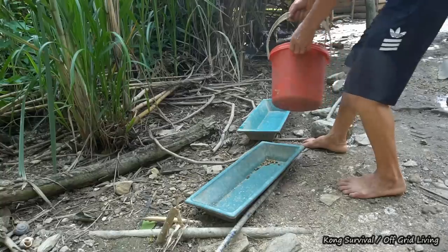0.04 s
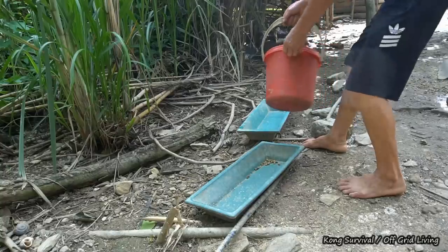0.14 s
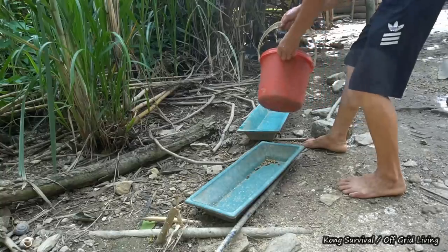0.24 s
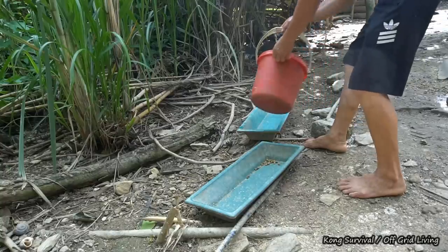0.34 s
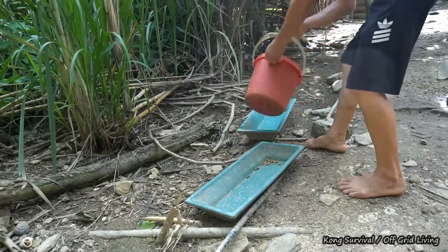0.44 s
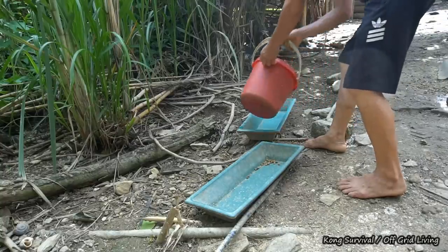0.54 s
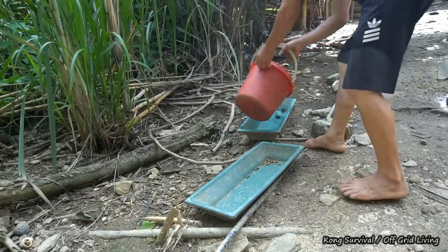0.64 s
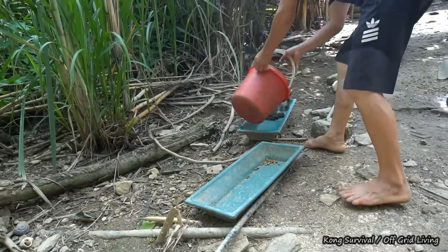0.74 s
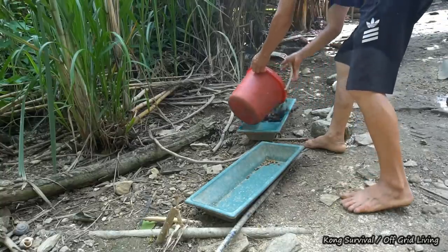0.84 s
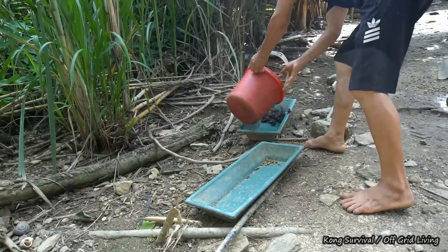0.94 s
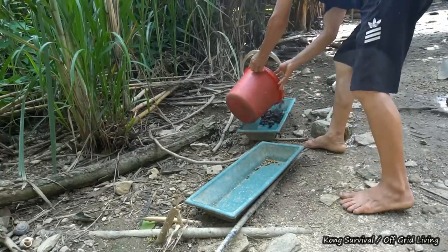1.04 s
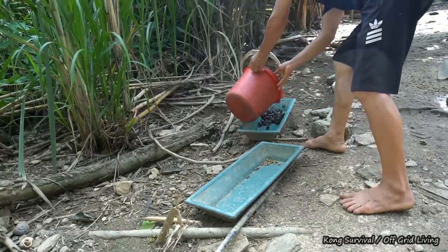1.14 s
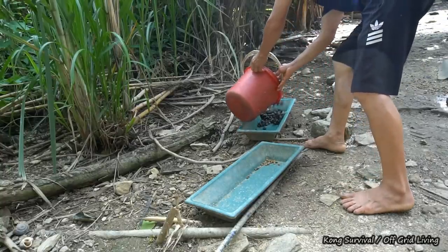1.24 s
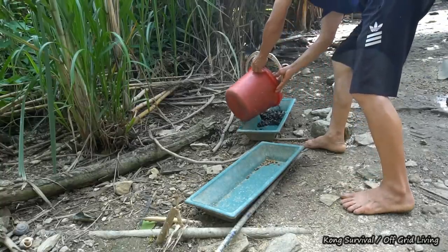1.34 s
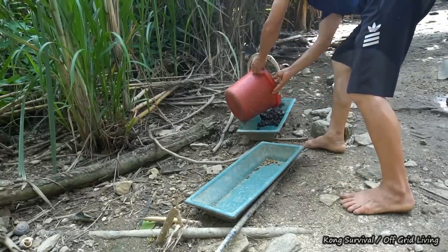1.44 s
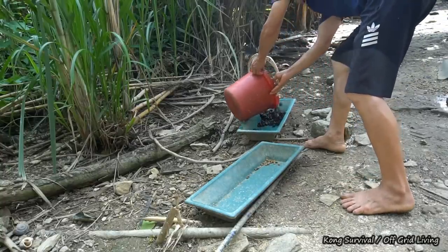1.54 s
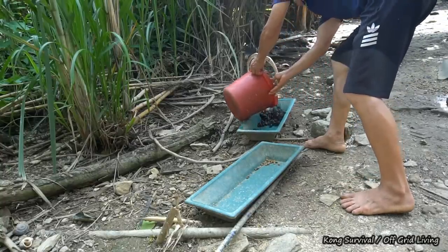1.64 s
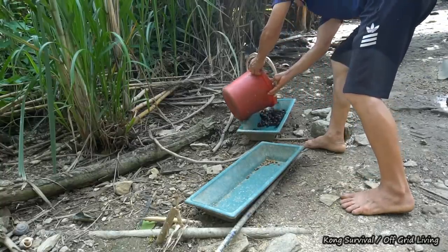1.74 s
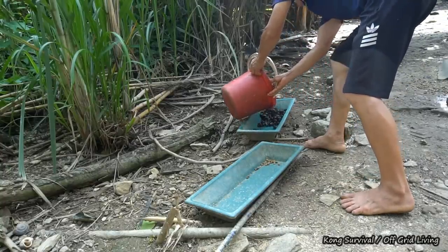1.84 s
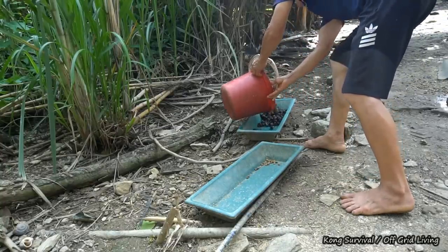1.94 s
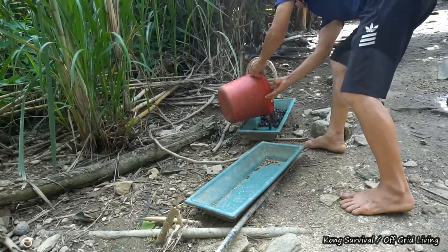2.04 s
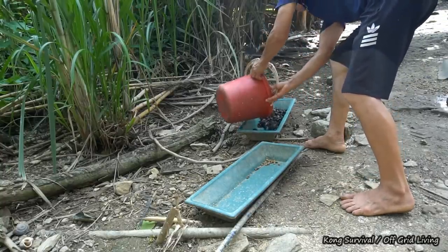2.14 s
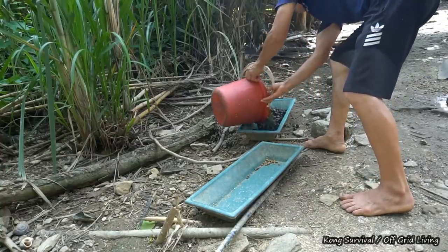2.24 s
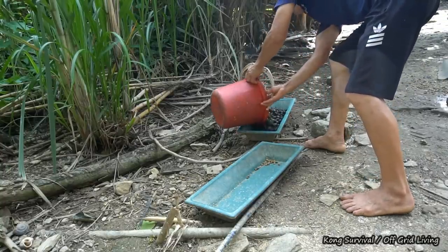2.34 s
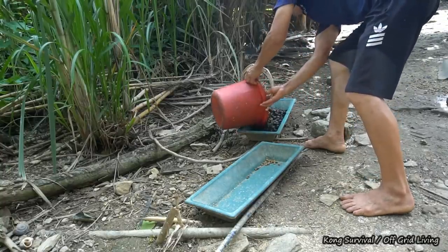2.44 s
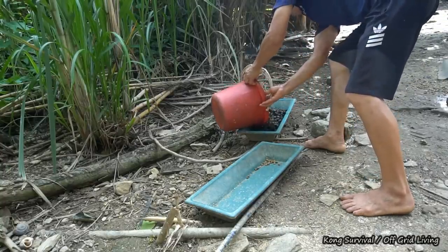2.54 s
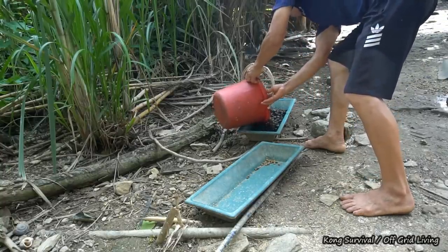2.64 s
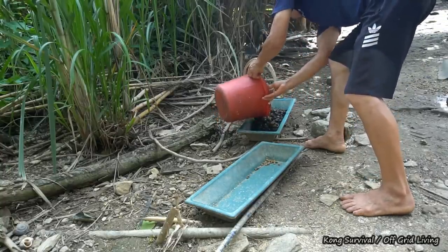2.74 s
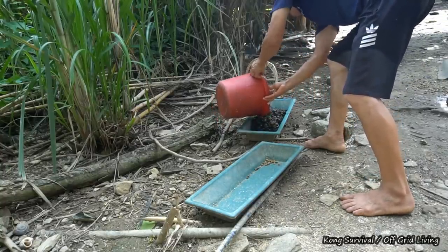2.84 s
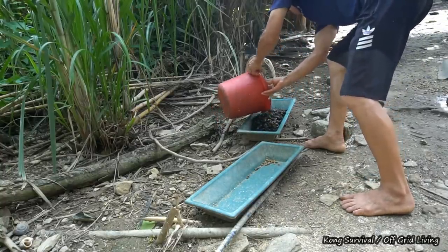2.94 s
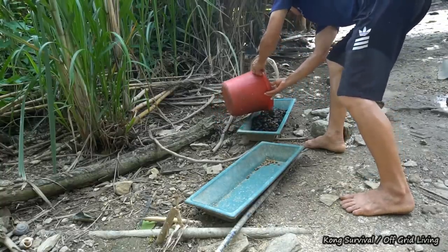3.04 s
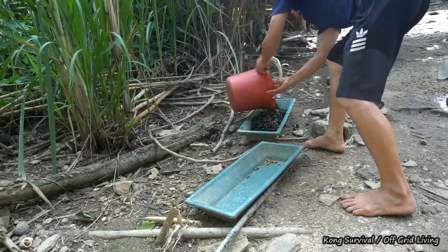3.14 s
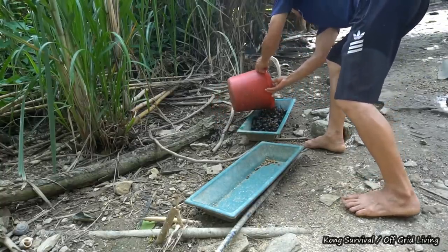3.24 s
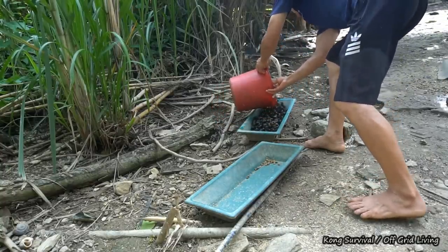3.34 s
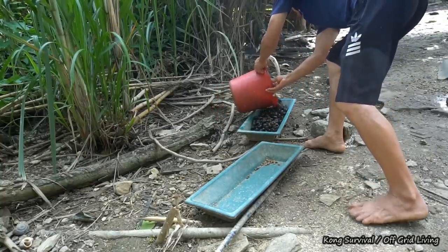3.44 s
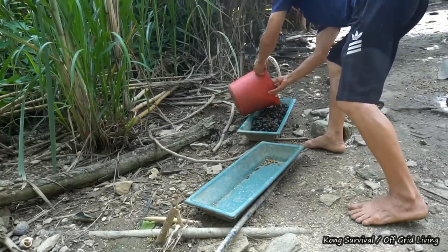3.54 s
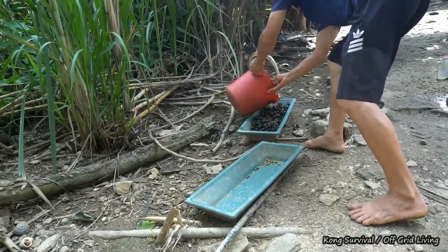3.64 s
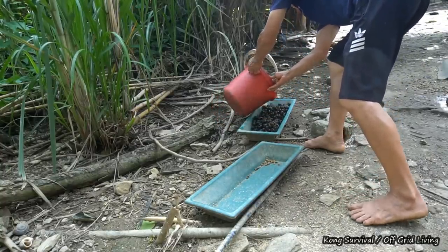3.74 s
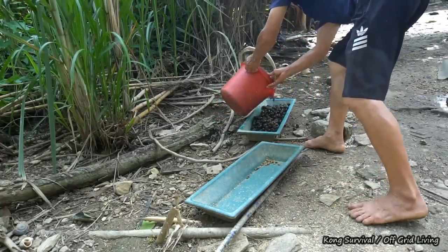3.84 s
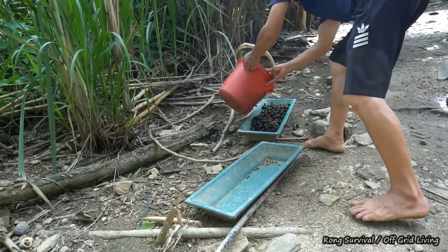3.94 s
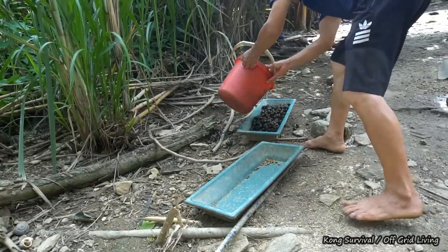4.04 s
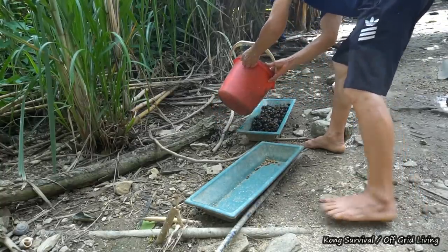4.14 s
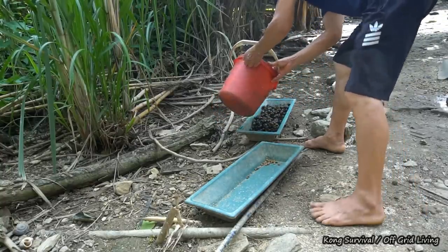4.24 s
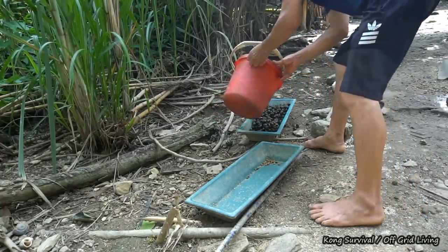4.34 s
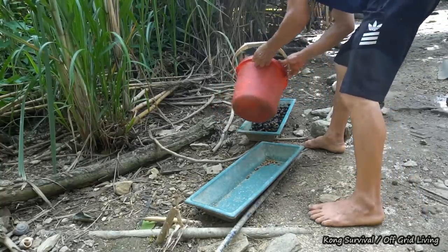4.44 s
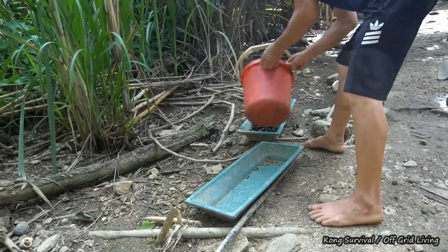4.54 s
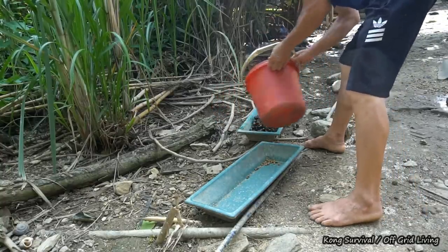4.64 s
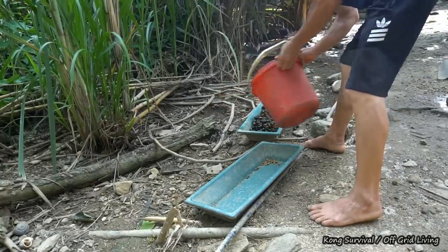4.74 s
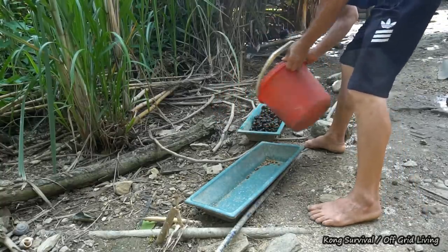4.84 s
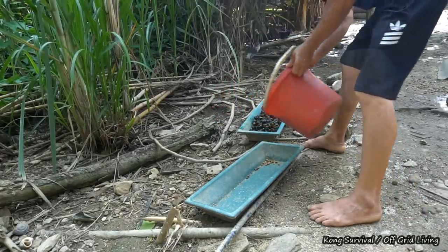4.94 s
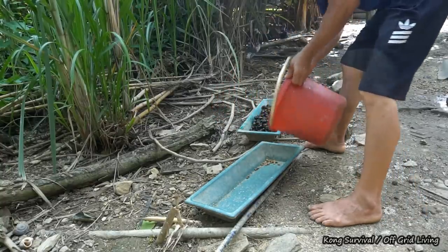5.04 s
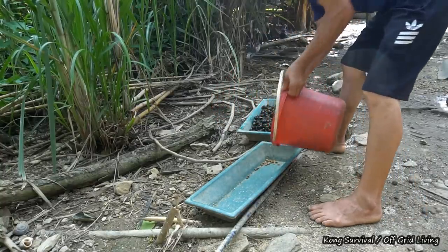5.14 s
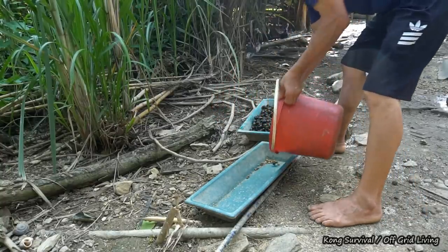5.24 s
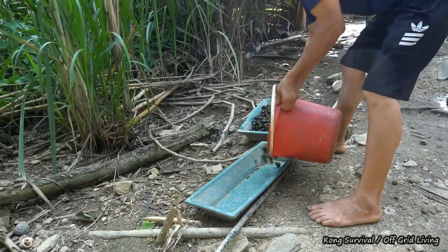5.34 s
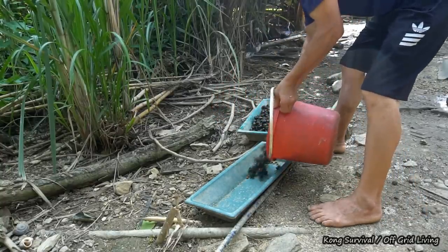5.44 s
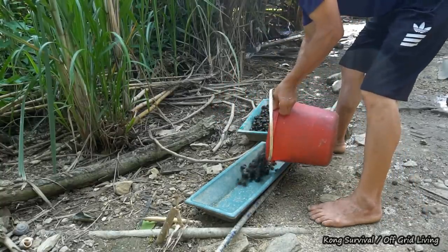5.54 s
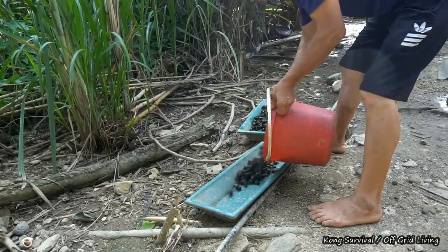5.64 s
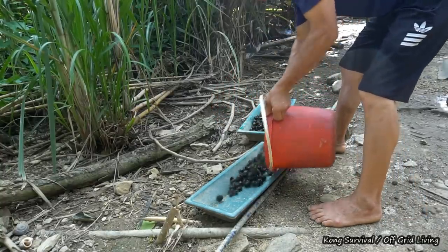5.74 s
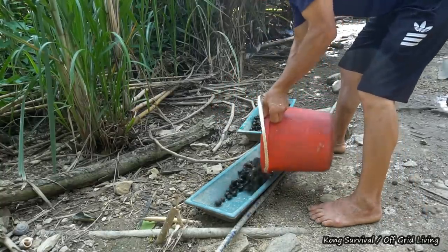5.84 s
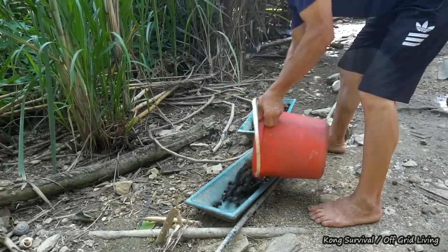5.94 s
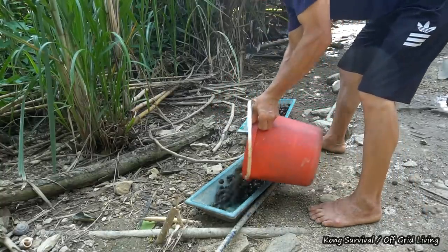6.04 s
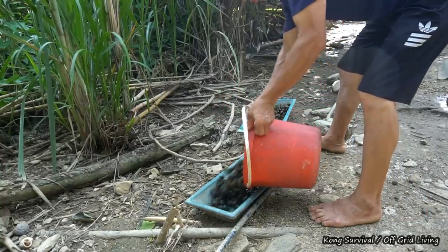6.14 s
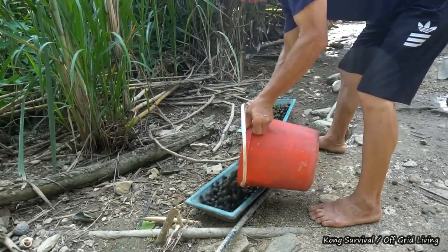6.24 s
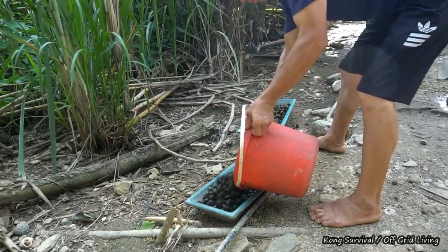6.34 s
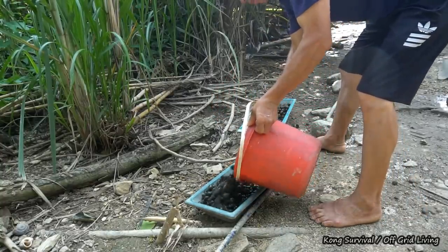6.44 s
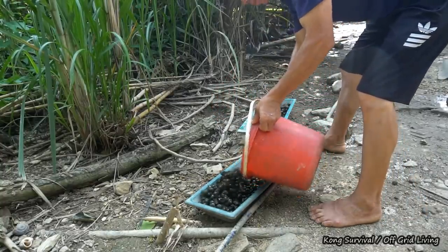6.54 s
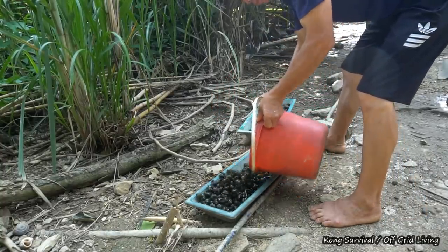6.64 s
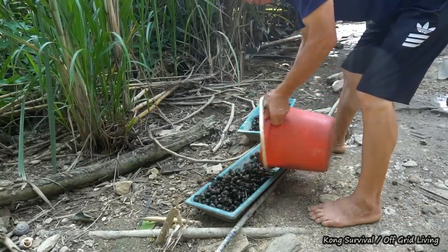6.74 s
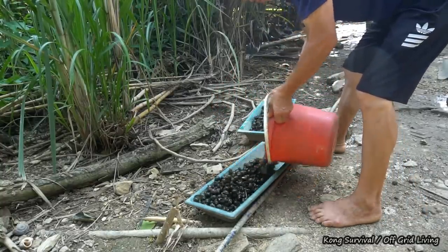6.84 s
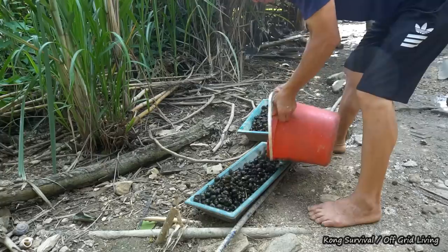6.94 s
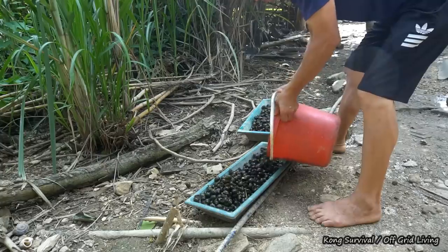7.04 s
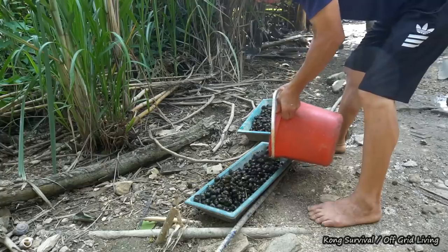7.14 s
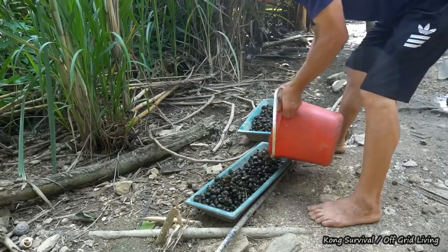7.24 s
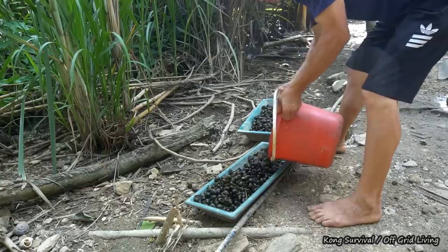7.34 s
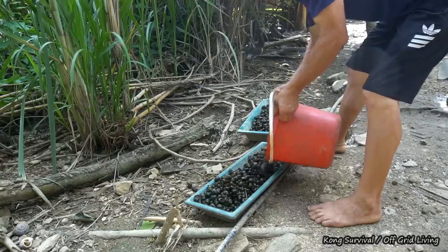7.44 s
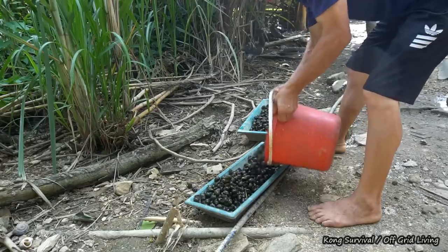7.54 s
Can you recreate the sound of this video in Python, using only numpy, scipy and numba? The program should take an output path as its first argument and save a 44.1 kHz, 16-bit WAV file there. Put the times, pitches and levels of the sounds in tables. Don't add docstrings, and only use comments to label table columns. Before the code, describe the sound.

Hard-shelled snails pour from a plastic bucket into two plastic trays, clattering in jerky surges outdoors, with insects and a faint distant rooster behind.

```python
import sys
import numpy as np
from scipy import signal
from scipy.io import wavfile
from scipy.ndimage import uniform_filter1d
from numba import njit

SR = 44100
rng = np.random.default_rng(int(sys.argv[2]) if len(sys.argv) > 2 else 0)


def wrap_up_sound(samples):
    columns = np.atleast_2d(samples).T
    tamed = np.clip(columns, -1, 1)
    steps = np.round(tamed * 32767).astype(np.int16)
    wavfile.write(sys.argv[1], SR, steps)


def volts_from_decibels(level):
    exponent = np.asarray(level, float) / 20
    return 10 ** exponent


N = 334719

# start in seconds, length in seconds, flow in dB,
# brightness in dB (low on bare plastic, high on a heap of shells).
FAR_SURGES = [(0.433, 0.25, -34.5, -4.5), (0.563, 0.06, -30, -3), (0.676, 0.095, -26.5, -3),
              (0.794, 0.26, -22, 1.5), (1.024, 0.23, -24.5, 2), (1.294, 0.15, -26, 1.5),
              (1.489, 0.1, -27.5, 3), (1.585, 0.2, -26.5, 1.8), (1.709, 0.14, -28.5, 2.5),
              (1.877, 0.085, -27.5, -3), (1.927, 0.12, -27, 5), (2.071, 0.053, -24, 1),
              (2.165, 0.16, -24, -0.5), (2.332, 0.17, -20.5, 1.7), (2.518, 0.17, -24, 1.5),
              (2.706, 0.49, -29.5, 0), (2.932, 0.22, -27, 1), (3.117, 0.13, -34, -3),
              (3.274, 0.1, -24.5, 2), (3.347, 0.22, -26, 0.0), (3.511, 0.19, -25.5, 0),
              (3.659, 0.18, -29.5, -1), (3.817, 0.098, -36, -4), (3.999, 0.091, -32, 2.5),
              (4.086, 0.015, -48, 16)]
NEAR_SURGES = [(5.138, 0.015, -43.5, 3), (5.233, 0.05, -33, -5.5), (5.324, 0.076, -28, -4),
               (5.427, 0.075, -24.5, -1.5), (5.523, 0.2, -20.5, 1), (5.718, 0.11, -23.5, -1),
               (5.841, 0.12, -22.5, -1.5), (5.913, 0.26, -21.5, 2.5), (6.111, 0.1, -22.5, 1),
               (6.222, 0.14, -20.5, 2), (6.394, 0.076, -24.5, 0), (6.477, 0.13, -22.5, 1.3),
               (6.642, 0.13, -24, 0.5), (6.814, 0.052, -25, -2.5), (6.877, 0.1, -21, 1),
               (7.0, 0.14, -24, 1), (7.075, 0.098, -23.5, -1), (7.21, 0.1, -25.5, 0.5),
               (7.327, 0.076, -24.5, 2), (7.453, 0.063, -25.5, -2), (7.514, 0.081, -27.5, 2)]
RISE_DB_PER_S, SAG_DB_PER_S, STOP_DB_PER_S = 439, 14.5, 350
USUAL_FLOW_DB = -25
TRAY_DB, TRAY_GROWTH, TRAY_MUFFLED = -0.5, 1.71, 0.62
CHIP_DB = -7
NEAR_TRAY_FROM_S = 5.1

# time in seconds, peak in dB, shell pitch in Hz, tray share in dB.
FAR_HITS = [(0.417, -5, 3220, -5), (0.564, 0, 1750, -9), (0.592, -4.5, 1860, -8.5), (0.605, -2, 1890, -7),
            (0.679, 3, 2900, -6), (0.709, -5, 3770, -2), (0.719, -3, 4900, -25), (0.751, -2.5, 3560, -20),
            (0.773, -4, 1850, -4), (0.901, 2, 1200, -15), (1.003, -2.5, 1490, -0.5), (1.303, -1, 7900, -24),
            (1.362, -13, 1930, -20), (1.435, -3, 1700, -12), (1.57, -3, 3130, -31), (1.584, 1, 2030, -5.5),
            (1.872, -2.5, 1200, -1.5), (2.051, -1.5, 2050, -27), (2.077, -2.5, 2100, -4),
            (2.12, -1, 4250, -29.5), (2.156, 0, 4640, -6.5), (2.299, -5.5, 1270, 3),
            (2.726, -2, 6900, -37.5), (2.758, -0.5, 4450, -23), (2.911, -18, 2470, -5),
            (3.054, -1, 2280, -14), (3.227, 1, 3050, -27), (3.665, -3, 2260, -17), (3.846, -5.5, 3000, -5),
            (3.999, 1, 2580, -7)]
NEAR_HITS = [(5.232, 1, 2530, -8), (5.274, -9, 3600, -21), (5.301, -8, 664, -10), (5.309, 0, 2450, -11),
             (5.348, -9, 3530, -16), (5.308, -5, 700, -27), (5.395, -4, 5500, -4.5),
             (5.444, -0.5, 2970, -15), (5.471, -7, 1360, 5.5), (5.507, -2, 1200, -7),
             (5.827, -4, 2270, -13), (5.911, -3, 1320, -25), (6.008, 0.5, 6250, -36),
             (6.207, -3.5, 1390, -7), (6.356, -0.5, 4300, -35), (6.398, -3.5, 4280, -29),
             (6.468, -8, 1350, -9), (6.658, -3, 1820, -30), (6.726, -1.5, 2420, -12), (6.822, -3, 1370, -9),
             (6.866, 3, 2350, -10), (6.936, 3.5, 4800, -24), (6.989, -3.5, 1200, -10),
             (7.04, -7, 1270, -1.5), (7.086, -0.5, 1280, -9), (7.16, -1, 3740, -6), (7.208, -6, 1700, -26),
             (7.243, -1.5, 4740, -37), (7.32, -2.5, 1290, -9), (7.365, -5, 4850, -30),
             (7.457, -7, 3550, -7), (7.507, -7, 2400, 3)]
# time in seconds, peak in dB, shell pitch in Hz, tray share in dB,
# tick share in dB.
STRAY_HITS = [(0.327, -25, 1400, 2, -25), (0.373, -25.5, 1400, -4, -19), (4.29, -29.5, 4800, -11, -10),
              (4.361, -23, 4040, -25, -25), (4.393, -15, 2520, -5.5, -23), (4.498, -28.5, 1410, -17, -24),
              (4.525, -36, 4900, 8, -27), (4.569, -15.5, 3300, -15, -26), (4.581, -20, 1900, 0.5, -26),
              (4.588, -18.5, 576, -22, -28), (4.593, -14, 2700, -4, -23), (4.599, -19, 1700, -6, -24),
              (4.687, -26, 1200, 0, -33), (4.379, -28, 2310, -15, -21), (4.774, -29.5, 380, -13, -13),
              (4.852, -11, 2860, -12, -36), (4.873, -25, 2430, -5, -18), (5.118, -34, 1310, 4, -20),
              (5.136, -11.5, 5100, -25, -16)]
TICK_DB, TICK_GROWTH = -22, 3

# time in
# seconds, peak in dB, shell pitch in Hz.
FAR_CLICKS = [(0.446, -26, 1280), (0.474, -26, 1600), (0.542, -25, 1000), (0.6713, -15, 3350),
              (0.6902, -9, 1750), (0.788, -15, 4850), (0.7987, -8, 1180), (0.8087, -20, 1800),
              (0.816, -12, 4540), (0.846, -11, 2300), (0.8683, -15, 10810), (0.8784, -11, 1970),
              (0.8863, -9, 4050), (0.9114, -9.5, 1540), (0.9473, -14.5, 5500), (0.967, -6, 2200),
              (0.986, -14, 5510), (1.0349, -18, 4860), (1.043, -10, 1200), (1.0837, -9.5, 6030),
              (1.1048, -11.5, 1830), (1.1199, -11.5, 3020), (1.145, -13, 7500), (1.156, -15, 1750),
              (1.1766, -10, 5300), (1.1855, -11, 2180), (1.212, -13.5, 1680), (1.227, -12, 10700),
              (1.2374, -13, 12300), (1.3681, -10, 7000), (1.397, -13, 8870), (1.409, -12.5, 5700),
              (1.4195, -17, 7500), (1.5041, -14, 8920), (1.551, -13, 8000), (1.605, -12, 3800),
              (1.631, -8.5, 4870), (1.651, -12, 1870), (1.6627, -16, 7500), (1.673, -13.5, 4750),
              (1.703, -11, 1930), (1.7245, -20, 4100), (1.7475, -10, 7900), (1.766, -8.5, 6360),
              (1.8428, -13, 7030), (1.915, -12.5, 5040), (1.9523, -10, 7840), (1.96, -4, 4800),
              (2.023, -9.5, 5460), (2.091, -14, 11600), (2.1337, -13, 3970), (2.1611, -16, 4500),
              (2.1676, -10, 4700), (2.1844, -5.5, 1150), (2.1975, -8, 2060),
              (2.2205, -17, 9000), (2.2364, -15, 1820), (2.253, -15, 5800), (2.2918, -19, 11400),
               (2.3243, -9.5, 2460), (2.3344, -19, 2150), (2.343, -11, 6260), (2.3627, -15, 2900),
               (2.3811, -19, 1960), (2.3914, -15, 7530), (2.4076, -18, 6800), (2.427, -12, 1520),
               (2.457, -9.5, 1830), (2.524, -13, 1910), (2.583, -11, 2080), (2.598, -10, 5000),
               (2.625, -14, 6650), (2.6744, -16, 1220), (2.7134, -17, 7840), (2.798, -22, 5160),
               (2.961, -15, 4660), (2.968, -15, 1500), (2.975, -6, 2150), (3.0289, -16, 6500),
               (3.1127, -15, 5670), (3.132, -16.5, 7600), (3.1481, -21, 10500), (3.1567, -17, 4960),
               (3.198, -24, 5460), (3.254, -18.5, 2300), (3.2666, -19, 2120), (3.2833, -24, 2110),
               (3.2923, -20, 5470), (3.3013, -11.5, 5000), (3.3477, -11, 2780), (3.3788, -18, 3100),
               (3.412, -23, 8900), (3.467, -9.5, 4700), (3.5274, -16, 2430), (3.541, -13, 4730),
               (3.5535, -10.5, 2080), (3.5596, -12, 4370), (3.5845, -13, 1860), (3.639, -18, 7780),
               (3.647, -16, 2560), (3.7745, -18, 4500), (3.8176, -21, 8800), (3.8997, -19, 1840),
               (3.9942, -14.5, 4850), (4.0084, -15, 2640), (4.092, -18, 7250)]
NEAR_CLICKS = [(5.3682, -12, 2300), (5.4787, -16, 8650), (5.533, -14, 6150), (5.6008, -16, 8730),
               (5.653, -11.5, 2390), (5.661, -12, 6700), (5.671, -11, 3850), (5.6828, -10, 6350),
               (5.725, -13, 3600), (5.74, -11, 2480), (5.7472, -16, 6990), (5.7624, -17, 9026),
               (5.7773, -12, 6800), (5.819, -10.5, 6230), (5.8443, -11, 6740), (5.869, -10, 5200),
               (5.9158, -9, 8500), (5.927, -13, 4000), (5.933, -18, 4000), (5.9468, -12, 1750),
               (5.962, -8, 2930), (5.971, -17, 3380), (6.051, -4.5, 5170), (6.0816, -13, 6170),
               (6.113, -20, 4180), (6.1197, -8, 7370), (6.135, -11, 4200), (6.1524, -14, 2730),
               (6.1589, -19, 3500), (6.2229, -13.5, 2880), (6.257, -12, 5400), (6.272, -14, 9300),
               (6.303, -11, 9050), (6.3657, -9, 5260), (6.366, -9, 4150), (6.446, -10, 5200),
               (6.4745, -11, 3340), (6.486, -12.5, 1730), (6.503, -9, 4110), (6.5137, -8, 4930),
               (6.5578, -13, 10600), (6.6173, -10, 6200), (6.6437, -14, 6230), (6.7476, -14.5, 2060),
               (6.7684, -8.5, 4400), (6.7893, -15.5, 8600), (6.8891, -26, 7800), (6.925, -20, 4730),
               (6.9538, -7, 2500), (7.0719, -12, 9000), (7.0946, -15, 5650), (7.1245, -17, 5760),
               (7.141, -11, 2900), (7.2188, -13, 6430), (7.272, -16, 3950), (7.3262, -8.5, 4870),
               (7.383, -9.5, 6700), (7.516, -8, 2040), (7.5296, -8.5, 7900), (7.544, -7, 6630)]
SPREAD = np.tan(np.linspace(-1.1, 1.1, 24))
TOP_HZ = 15850

# pitch in Hz, spread in Hz from blow to blow, level in dB.
FAR_TRAY = [(192, 55, -23), (680, 58, 1), (885, 45, -0.5), (1200, 127, 4), (1750, 130, 1.5), (2260, 260, 0)]
NEAR_TRAY = [(160, 64, -18.5), (680, 45, 1.5), (860, 30, -7), (1247, 117, 1.5), (1700, 212, -1),
             (2350, 84, -4.5)]
# pitch in Hz, level in dB.
SHELL_TONE = [(1180, -7), (2000, -10.5), (3260, -8), (4600, -9), (14100, -25.5), (15600, -22)]

# start in seconds, length in seconds, level in dB.
SHOVES = [(2.108, 0.017, -34.5), (2.34, 0.077, -31), (2.94, .005, -34), (2.97, .005, -42),
          (3.027, 0.01, -23.5), (3.385, 0.027, -22), (3.585, 0.0069, -29.5), (4.59, 0.012, -45.5),
          (5.313, 0.012, -37), (5.55, 0.015, -38), (5.87, 0.012, -21.5), (5.94, 0.03, -27),
          (6.268, 0.018, -26.5), (6.927, 0.005, -19), (7.089, 0.0066, -28.5), (7.301, 0.0059, -19),
          (7.518, 0.0043, -23)]
SHOVE_RISE_DB_PER_S, SHOVE_SAG_DB_PER_S, SHOVE_STOP_DB_PER_S = 380, 30, 650
SLIDE_DB = -15
# pitch in Hz, width in Hz, level in dB when full, level in dB when emptier.
BUCKET_WALL = [
    (316.5, 76, 2, -10),
    (395.4, 53, -7, 3.5),
]

# time in seconds, pitch in Hz, level in dB.
CROW = [(.02, 648, -58), (.13, 676, -58), (.165, 717, -55), (.195, 742, -52.5), (.208, 826, -57),
        (.27, 780, -53), (.43, 737, -51.5), (.68, 680, -42)]
CROW_OCTAVE_DB = [0, -13]
WARBLE_FROM_S, WARBLE_TO_S, WARBLES_PER_S, WARBLE_DB = .155, .488, 9, 8
# time in seconds, pitch in Hz, level in dB.
PEEP = [(0, 11900, -68), (.035, 12800, -65), (.08, 11900, -70)]
# time in seconds, pitch in Hz, level in dB.
CHEEP = [(5.074, 8100, -58), (5.084, 8300, -51), (5.098, 8100, -60)]
# time in seconds, pitch in Hz, level in dB.
CRICKET = [(0, 4765, -58), (.8, 4765, -58), (4.5, 4850, -65), (5.2, 4850, -70)]
# pitch in Hz, width in Hz, throbs a second, throb depth from 0 to 1,
# level in dB early, level in dB late.
INSECTS = [
    (7520, 220, 20, 0.22, -49.5, -73),
    (15200, 250, 25, .95, -69, -87),
    (3680, 110, 5.9, 0, -64, -66),
    (4850, 690, 1.66, 0.17, -59.5, -58),
    (7500, 810, 11, 0, -90, -64.5),
]

# frequency in Hz, level in dB per Hz.
AIR = [(16, -43), (33, -20), (52, -1.5), (78, -7.5), (110, -2), (175, -10), (300, -12), (754, -15),
       (3160, -22), (5570, -27.5), (16000, -35)]
AIR_DB = -50.5
# frequency in Hz, likeness from 0 to 1.
AIR_SAME = [(20, .9995), (150, .997), (500, .93), (3000, .6), (12000, .2)]
TAILS = 7


def pour():
    tray_db, shell_db, chip_db = stream()
    place, luck, heavy, *share = rng.random((11000, 6)).T
    at = (place * N).astype(int)
    share = np.array(share) - .5
    clumps_db = 2.0 * evened(uniform_filter1d(rng.standard_normal(N), 400))
    crowd = np.clip(volts_from_decibels(.8 * (shell_db + 21)), .34, 1)[at]
    lands = np.clip(8 * (.88 * crowd * volts_from_decibels(clumps_db[at]) - luck), 1e-9, 1)
    size_db = 2.2 * np.minimum(-np.log(heavy), 3.6) + 20 * np.log10(lands)

    knocks = knock(at, size_db + 9 * share[0], 0.012)
    top_hz = 7400 * volts_from_decibels(.3 * np.clip(chip_db - shell_db + 9, -12, 0))[at, None]
    clacks = clack(at, size_db + 10 * share[1], 1900, top_hz, .0065, 2.5, count=10)
    chips = clack(at, size_db + 10 * share[2], 6750, 15630, .006, 4.2, count=12)

    lull = np.zeros(N)
    hit_s = np.array(FAR_HITS + NEAR_HITS)[:, 0]
    lull[(hit_s * SR).astype(int) - 330] = 600
    lull_db = -2.8 * np.minimum(uniform_filter1d(lull, 600), 1)

    lean = np.array([[-1], [1]])
    layers = zip((knocks, clacks, chips), (tray_db, shell_db, chip_db), (1.1, .9, .45))
    return sum(steady(x, size=2600) * volts_from_decibels(db - 2.5 + lull_db + lean_db * lean) for x, db, lean_db in layers)


def stream():
    rows = np.array(FAR_SURGES + NEAR_SURGES)
    flow_db, bright_db = rows[:, 2], rows[:, 3]
    heavier_db = flow_db - USUAL_FLOW_DB
    tray_db = USUAL_FLOW_DB + TRAY_DB + TRAY_GROWTH * heavier_db - TRAY_MUFFLED * bright_db
    chip_db = flow_db + CHIP_DB + bright_db
    return [surges(rows, db, RISE_DB_PER_S, SAG_DB_PER_S, STOP_DB_PER_S) for db in (tray_db, flow_db, chip_db)]


def surges(rows, level_db, rise, sag, stop):
    t = np.arange(0, N + 64, 64) / SR
    start, length = np.transpose(rows)[:2, :, None]
    late = t - start
    shape_db = rise * np.minimum(late, 0) - sag * np.clip(late, 0, length)
    shape_db = shape_db - stop * np.maximum(late - length, 0)
    power = (volts_from_decibels(np.maximum(level_db[:, None] + shape_db, -140)) ** 2).sum(0)
    return np.interp(np.arange(N) / SR, t, 10 * np.log10(power))


def hits():
    s, db, hz, tray_db = np.transpose([row[:4] for row in STRAY_HITS] + FAR_HITS + NEAR_HITS)
    at = (s * SR).astype(int) + 4
    _, shell_db, chip_db = stream()
    tick_db = TICK_DB + TICK_GROWTH * (chip_db - shell_db - CHIP_DB)[at + 400]
    tick_db[:len(STRAY_HITS)] = np.array(STRAY_HITS)[:, -1]

    ratios = np.array([0.997, 0.772, 1.9, 1.3]) * np.exp(0.0021 * rng.standard_normal((len(s), 4)))
    mode_db = np.zeros(ratios.shape) + [1, -20, -9, -17]
    shell = ring(at, db - 10.0, hz[:, None] * ratios, mode_db, 0.014, 0.000905, 1.6, scatter=.2)
    around = hz[:, None] * np.exp(0.3 * SPREAD + 0.051 * rng.standard_normal((len(s), 24)))
    around = np.minimum(around, TOP_HZ)
    crack = ring(at, db - 8.0, around, np.zeros(around.shape), 0.007, 0.00091, 3.8, scatter=0.51)
    tray = knock(at, db + tray_db, 0.013) + knock(at, db + tray_db, 0.013)
    tick = clack(at, db + tick_db, 5300, 18400, 0.0071, 6.8, count=20)
    return (shell + crack + tray + tick) * volts_from_decibels([[-1.2], [1.2]])


def clicks():
    s, db, hz = np.transpose(FAR_CLICKS + NEAR_CLICKS)
    at = (s * SR).astype(int) - 8
    note = ring(at, db - .5, hz[:, None], np.zeros((len(s), 1)), 0.0081, 0.0006, 2.2, scatter=0.33)
    around = hz[:, None] * np.exp(0.282 * SPREAD[::2] + 0.043 * rng.standard_normal((len(s), 12)))
    around = np.minimum(around, TOP_HZ)
    crack = ring(at, db, around, np.zeros(around.shape), 0.0074, 0.000602, 4.36, scatter=0.45)
    tray = knock(at, db + 0.5 - 5 * np.log2(hz / 1000), 0.012)
    return (note + crack + tray) * volts_from_decibels([[-.9], [.9]])


def knock(at, size_db, t60):
    near = (at > NEAR_TRAY_FROM_S * SR)[:, None, None]
    hz, spread, db = np.where(near, NEAR_TRAY, FAR_TRAY).transpose(2, 0, 1)
    chance = rng.standard_normal((*hz.shape, 2))
    hz = hz + spread * chance[..., 0]
    db = db + 2.6 * chance[..., 1]
    return ring(at, size_db, hz, db, t60, 0.001604, 1.33)


def clack(at, size_db, low_hz, high_hz, t60, wide_db, count):
    hz = low_hz * (high_hz / low_hz) ** rng.random((len(at), count))
    db = read(SHELL_TONE, hz) + 10 * np.log10(hz / low_hz) + 3.2 * rng.standard_normal(hz.shape)
    return ring(at, size_db, hz, db, t60, 0.000094, wide_db, scatter=0.73)


def ring(at, size_db, hz, db, t60, rise, wide_db, scatter=1):
    chance = rng.standard_normal((len(at), hz.shape[1], 2))
    level = volts_from_decibels(db) / np.linalg.norm(volts_from_decibels(db), axis=1, keepdims=True)
    phase = 2 * np.pi * (scatter * rng.random(hz.shape) - hz * rise)
    start = level * volts_from_decibels(size_db)[:, None] * np.exp(1j * phase)
    fade = volts_from_decibels(-60 / (SR * t60 * np.exp(.17 * chance[..., 0])))
    sides = volts_from_decibels(wide_db * chance[:, :1, 1] * [1, -1])
    out = np.zeros((2, N))
    add(out, at, sides, 2 * np.pi * hz / SR, fade, start, np.exp(-1 / (rise * SR)))
    return out


@njit
def add(out, at, sides, turn, fade, start, rise):
    for k in range(len(at)):
        for m in range(turn.shape[1] if abs(start[k, 0]) > 1e-7 else 0):
            step, z, soft = fade[k, m] * np.exp(1j * turn[k, m]), start[k, m], 1.
            for i in range(at[k], min(at[k] + int(-5 / np.log(fade[k, m])), out.shape[1])):
                v = z.real * (1 - soft)
                out[0, i] += sides[k, 0] * v
                out[1, i] += sides[k, 1] * v
                z *= step
                soft *= rise


def bucket():
    bumps = volts_from_decibels(3.4 * rng.exponential(1, N)) * (rng.random(N) < 900 / SR) * rng.choice([-1, 1], N)
    late = np.clip(np.arange(N) / SR - 5.9, 0, 1)
    wall = np.zeros(N)
    for hz, width, full_db, empty_db in BUCKET_WALL:
        wall += volts_from_decibels(full_db + late * (empty_db - full_db)) * evened(resonate(bumps, hz, width))
    body = evened(resonate(bumps, 315, 290))
    shove_db = surges(SHOVES, np.array(SHOVES)[:, 2],
                      SHOVE_RISE_DB_PER_S, SHOVE_SAG_DB_PER_S, SHOVE_STOP_DB_PER_S)
    level_db = 10 * np.log10(volts_from_decibels(shove_db) ** 2 + volts_from_decibels(stream()[0] + SLIDE_DB) ** 2)
    drumming = volts_from_decibels(np.clip(2.3 * (level_db + 27.5), -16, 0))
    return steady((drumming * wall + (1.15 - drumming) * body)[None], size=1000) * volts_from_decibels(level_db)


def resonate(x, hz, width):
    for wide in (width, 1.6 * width):
        x = signal.lfilter(*signal.iirpeak(hz, hz / wide, fs=SR), x)
    return x


def steady(x, size):
    power = uniform_filter1d((x ** 2).mean(0), size)
    return x / np.sqrt(uniform_filter1d(power, size) + 1e-3)


def evened(x):
    return x / np.sqrt(np.mean(x ** 2) + 1e-20)


def read(points, hz):
    f, value = np.transpose(points)
    return np.interp(np.log(hz + 1), np.log(f + 1), value)


def yard(x):
    t, turn, out = np.arange(4000) / SR, np.arange(N) / SR * 23, 0
    for k in range(TAILS):
        shared, left, right = rng.standard_normal((3, len(t))) * volts_from_decibels(-60 * t / .075) * (t > .0015)
        tail = np.array([shared + .5 * np.diff(own, prepend=0) for own in (left, right)])
        fed = x * np.sqrt(np.clip(1 - abs((turn - k) % TAILS - 1), 0, 1))
        out = out + signal.oaconvolve(fed, tail / np.linalg.norm(tail[0]), axes=1)[:, :N]
    return out


def rooster():
    t = np.arange(N) / SR
    warble_s = np.clip(t, WARBLE_FROM_S, WARBLE_TO_S) - WARBLE_FROM_S
    waves = np.sin(2 * np.pi * WARBLES_PER_S * warble_s)
    octave = call(np.array(CROW) * [1, 2, 1], 0.013) * volts_from_decibels(np.interp(t, [.2, .4], CROW_OCTAVE_DB))
    return call(CROW, 0.012) * volts_from_decibels(WARBLE_DB * waves) + octave


def call(rows, waver):
    hz = curve(rows, 1, 0) * (1 + waver * evened(uniform_filter1d(rng.standard_normal(N), 400)))
    tone = np.sin(2 * np.pi * np.cumsum(hz) / SR)
    flutter_db = 2.4 * evened(uniform_filter1d(uniform_filter1d(rng.standard_normal(N), 400), 400))
    level_db = uniform_filter1d(curve(rows, 2, -110), 300)
    return np.sqrt(2) * tone * volts_from_decibels(flutter_db + level_db)


def curve(rows, column, rest):
    t, out = np.arange(N) / SR, np.full(N, float(rest))
    rows = np.array(rows)
    inside = (t >= rows[0, 0]) & (t <= rows[-1, 0])
    out[inside] = np.interp(t[inside], rows[:, 0], rows[:, column])
    return out


def insects():
    t, out = np.arange(N) / SR, np.zeros((2, N))
    shared, *own = rng.standard_normal((3, N))
    rasp = (shared + 4.3 * np.array(own)) * (1 + 0.23 * np.cos(2 * np.pi * 200 * t))
    for hz, width, throbs, depth, early_db, late_db in INSECTS:
        gate = 1 + np.clip(depth, 0, 1) * np.tanh(2 * np.sin(2 * np.pi * throbs * t - .8))
        out += evened(resonate(rasp * gate, hz, width)) * volts_from_decibels(np.interp(t, [.6, 4], [early_db, late_db]))
    return out


def air():
    frames, hz = N // 1024 + 5, np.fft.rfftfreq(4096, 1 / SR)
    a, b, c, d, patches = rng.standard_normal((frames, 2049, 5)).T
    patches = evened(uniform_filter1d(uniform_filter1d(patches, 48, 0), 4, 1))
    same = np.clip(read(AIR_SAME, hz), -1, 1)[:, None]
    left = a + 1j * b
    right = same * left + np.sqrt(1 - same ** 2) * (c + 1j * d)
    z = np.array([left, right]) * volts_from_decibels(read(AIR, hz)[:, None] + 1.4 * patches)
    return volts_from_decibels(AIR_DB) * evened(signal.istft(z, nperseg=4096, noverlap=3072)[1][:, :N])


def scene():
    shells = pour() + hits() + clicks() + bucket()
    shells = signal.sosfilt(signal.butter(3, 120, "high", fs=SR, output="sos"), shells)
    singers = rooster() + call(CRICKET, 0.006) + call(PEEP, .002) + call(CHEEP, .03)
    busy_db = 10 * np.log10(abs(uniform_filter1d((shells ** 2).mean(0), 12000)) + 1e-9)
    ducked = air() * volts_from_decibels(-.2 * np.maximum(busy_db + 36, 0))
    return volts_from_decibels(-.5) * shells + volts_from_decibels(-7.0) * yard(shells) + singers + insects() + ducked


def low_pass(x):
    return signal.sosfilt(signal.butter(12, 16950, fs=SR, output="sos"), x)


def record(dry):
    edge = signal.firwin(401, TOP_HZ, window=("kaiser", 7), fs=SR)[None]
    soft = signal.oaconvolve(0.85 * np.tanh(dry / 0.68), edge, "same")
    return low_pass(soft)


dry = scene()
out = record(dry)
wrap_up_sound(out)
```